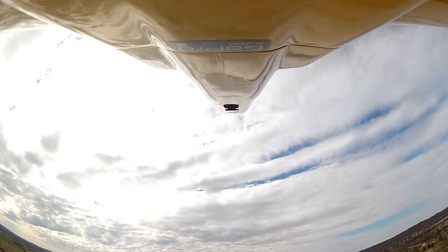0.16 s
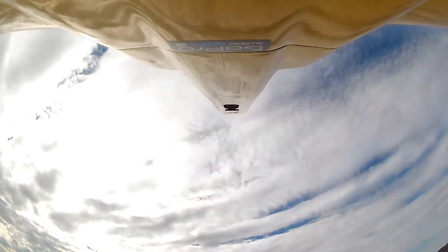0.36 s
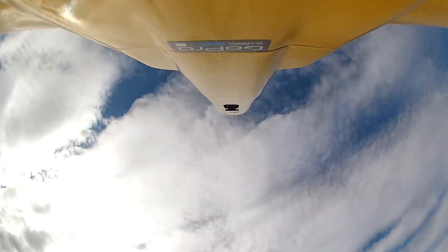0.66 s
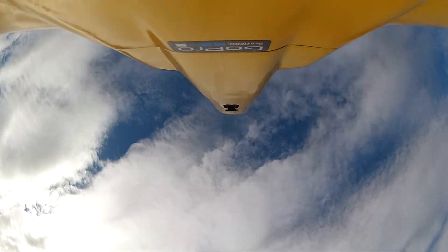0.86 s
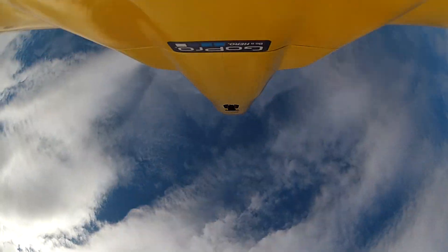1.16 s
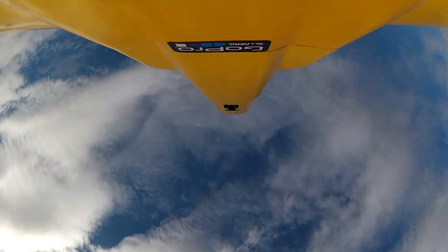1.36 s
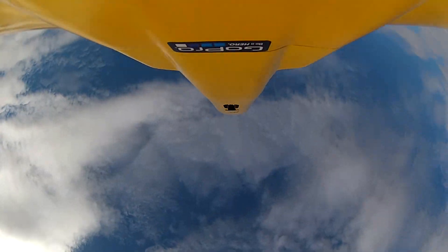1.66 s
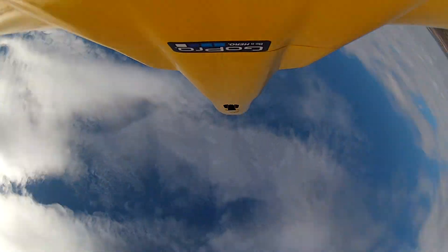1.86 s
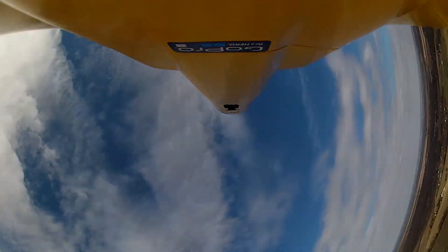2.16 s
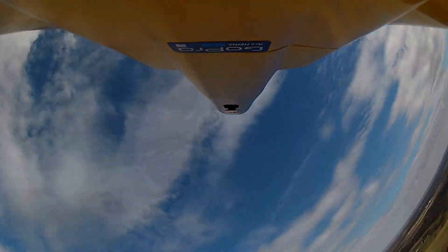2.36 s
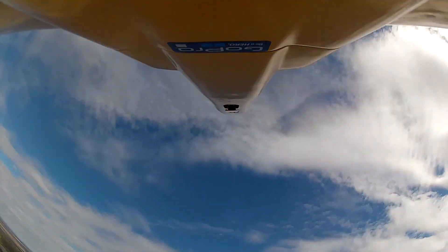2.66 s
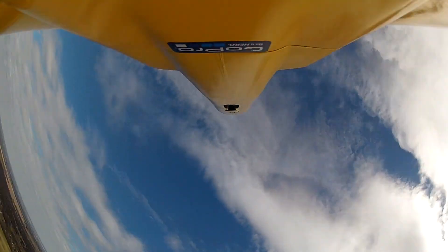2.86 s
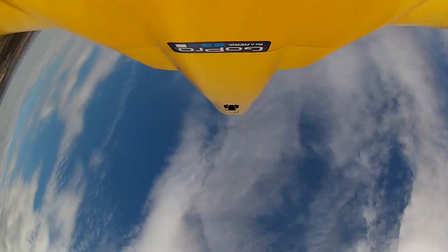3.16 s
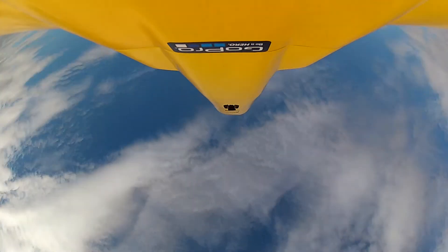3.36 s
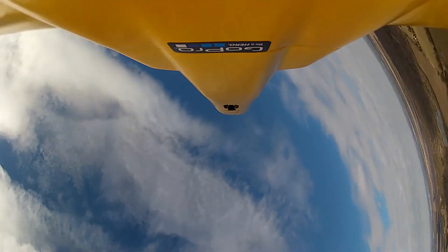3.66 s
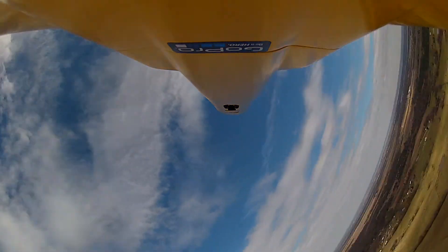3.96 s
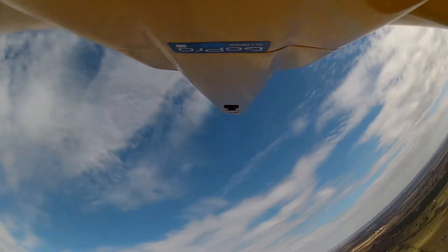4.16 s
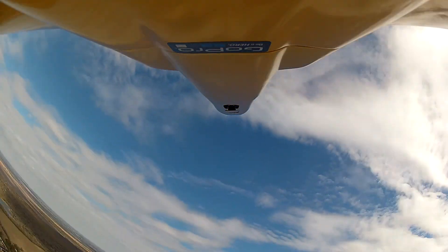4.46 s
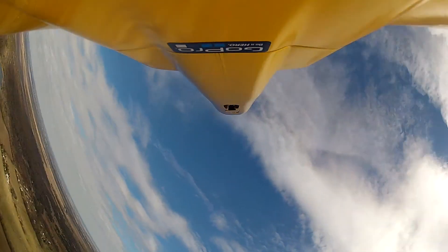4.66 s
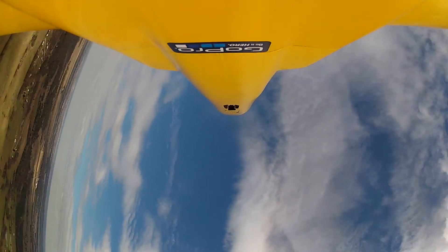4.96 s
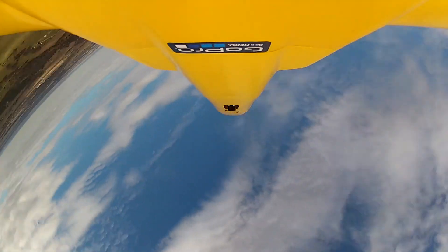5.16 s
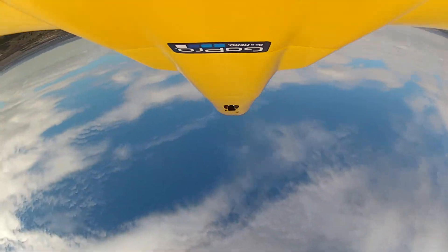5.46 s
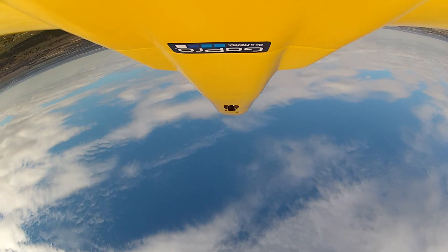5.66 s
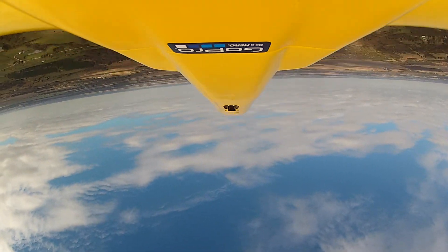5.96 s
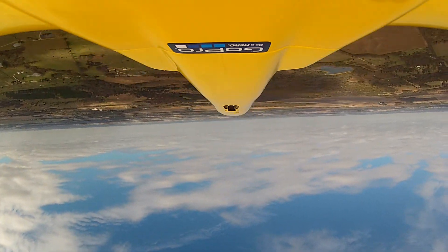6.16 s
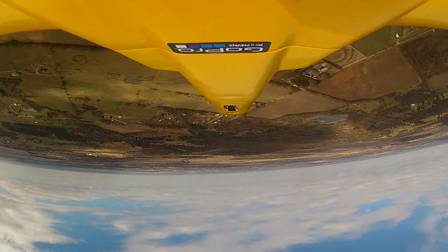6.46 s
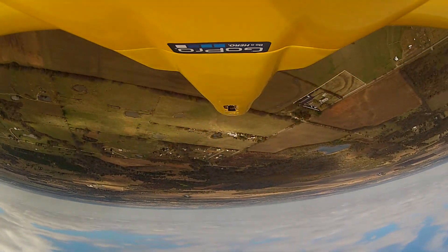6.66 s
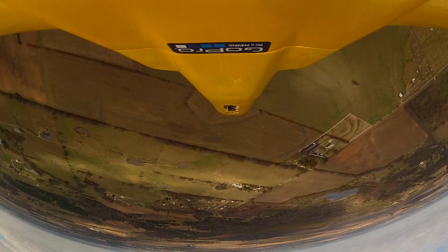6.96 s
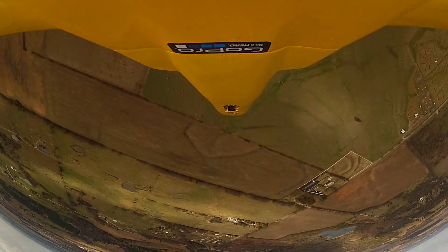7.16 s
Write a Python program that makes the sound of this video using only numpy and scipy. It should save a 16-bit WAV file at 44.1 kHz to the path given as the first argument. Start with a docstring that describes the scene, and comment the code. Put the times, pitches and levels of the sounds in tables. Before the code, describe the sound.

A small turbine jet is heard in flight, very close, from a microphone fixed to its fuselage. From the start there is a ringing, slightly metallic roar and a crackling hiss with a glassy top. A clean, high engine whine sits within it, nearly constant in pitch, growing louder over the first four seconds. Around 2 seconds the rush of air builds, and a low, hollow buffeting rises in the airframe. The whole sound dips very briefly a few times, most noticeably near 2 seconds. At about 4.8 seconds the engine spools down: the whine softens and glides lower, then swells again around 6 to 6.5 seconds as it settles on a lower note. The gusty air rush and low rumble keep growing through this, and stay strong until the end, a little after 7 seconds.

```python
"""Small turbine jet, heard from on board.

In the open air, the microphone rides in a camera fixed to the fuselage as the jet rolls and dives.
Close by, the shaft whines at full power, then spools down near 5 s, over the jet's roar and hiss.
The rush of air grows with speed and rings in the airframe and the camera housing.
The camera's gain control ducks briefly, and its low-rate sample-and-hold adds a glassy treble."""
import sys
import numpy as np
from scipy import signal
from scipy.fft import rfft, irfft
from scipy.io import wavfile
from scipy.ndimage import uniform_filter1d

SR = 44100
rng = np.random.default_rng(int(sys.argv[2]) if len(sys.argv) > 2 else 0)


def master(y):
    """Save y as 16-bit WAV."""
    cut = np.clip(np.atleast_2d(y).T, -1, 1)
    pcm = np.round(cut * 32767)  # scale
    wavfile.write(sys.argv[1], SR, pcm.astype(np.int16))


N = 322371
TIME, FREQ = np.arange(N) / SR, np.fft.rfftfreq(N, 1 / SR)


def shaft(cut_s=4.668, lag_s=0.2584, low_hz=1137.5, unload_s=4.82, unload_db=5.5, db_per_octave=12):
    """Speed (Hz) and whine level (dB): the throttle is cut and the shaft follows through three lags."""
    # the shaft at full throttle, creeping up: t/s, rotation f/Hz, whine level/dB
    full_power = [(0.15, 1810, -34.5), (0.6, 1814, -30), (1.75, 1827, -28), (2.3, 1825.5, -27.5),
                  (2.7, 1827, -25.2), (3.9, 1834, -23.4), (4.7, 1830, -23.6)]
    full_hz, full_db = curves(full_power)
    lags = np.maximum(TIME - cut_s, 0) / lag_s
    hz = low_hz + (full_hz - low_hz) * (1 + lags + lags ** 2 / 2) * np.exp(-lags)
    # off load the whine loses some level at once, then more as the shaft slows
    unloaded = (1 + np.tanh((TIME - unload_s) / 0.04)) / 2
    return hz, full_db - unload_db * unloaded + db_per_octave * np.log2(hz / full_hz)


def whine(trim_db=-0.03, waver_hz=0.69, shimmer_db=1.14, octave_db=-24):
    """One clean tone at the shaft rate, shaken a little by the air, with a faint octave."""
    hz, db = shaft()
    # the slowing whine sweeps into a resonance of the airframe
    peak_hz, width_hz, peak_db = 1169, 56, 12.5
    resonance = 1 + (gain_of(peak_db) - 1) / (1 + (2 * (hz - peak_hz) / width_hz) ** 2)
    phase = 2 * np.pi * np.cumsum(hz + waver_hz * wander(11.7)) / SR
    tone = np.sin(phase) + gain_of(octave_db) * np.sin(2 * phase)
    return np.sqrt(2) * tone * resonance * gain_of(db + trim_db + shimmer_db * wander(24))


def jet(roar_trim_db=0.5, hiss_trim_db=3.0, shrill_db=-29.0, surge_db=0.62, crackle_db=0.5):
    """The jet at close range: its roar rings fuselage and housing and surges with a crackling hiss."""
    # strength of the jet: t/s, relative roar level/dB, relative hiss level/dB
    jet_levels = [(0, -21, -35), (1, -21, -34), (1.4, -22.5, -37), (1.9, -21, -35), (2.6, -24, -34.3),
                  (3.2, -25, -37), (4.6, -26.5, -39.5), (4.95, -24.5, -37.5), (5.7, -23, -37.5),
                  (7.3, -23, -39.5)]
    # resonances of fuselage and camera housing: f/Hz, width/Hz, relative level/dB
    body_modes = [(267.4, 17, -8), (536, 32, -14), (874, 170, -20), (1880, 640, -15), (2180, 115, -4.5),
                  (2422, 232, 0), (2575, 92, 0.5)]
    # upper resonances of the housing: f/Hz, width/Hz, relative level/dB
    shrill_modes = [(2750, 600, 0), (3103, 140, 4.5), (3575, 207, 4.5), (3944, 165, -1.5)]
    # spectrum of the hiss: f/Hz, relative level/dB
    hiss_spectrum = [(30, -18), (300, -3.5), (1500, 1), (3500, -20), (4250, 5.5), (4620, 6.5), (4930, 2),
                     (5230, 6.5), (5650, 5.5), (5880, -4), (6000, -15)]
    roar_db, hiss_db = curves(jet_levels)
    surge = gain_of(surge_db * wander(13))
    roar = ringing(body_modes) * gain_of(roar_db + roar_trim_db)
    shrill = ringing(shrill_modes) * gain_of(shrill_db + 0.54 * (roar_db - roar_db.mean()))
    hz, db = np.transpose(hiss_spectrum)
    hiss_shape = gain_of(np.interp(np.log(FREQ + 1), np.log(hz), db))
    bursts = rng.standard_normal(N) * gain_of(crackle_db * wander(900))
    hiss = unit_rms(filtered(bursts, hiss_shape)) * gain_of(hiss_db + hiss_trim_db)
    return (roar + shrill + hiss) * surge


def slipstream(rush_trim_db=1, mount_db=-43.0, gust_db=1.0):
    """Faster air shakes the panels and the camera mount and blows harder across the cavities."""
    # airflow, growing with speed: t/s, buffeting level/dB, relative rush level/dB
    airflow = [(0.2, -43, -34), (0.7, -43.5, -29.5), (1.55, -41, -29), (2.25, -34, -24), (4.1, -35.5, -24),
               (5.3, -31.3, -22.5), (6.0, -29.3, -24), (7.3, -29, -23)]
    # airframe resonances under buffeting: f/Hz, width/Hz, relative level/dB
    panel_modes = [(110.5, 15, -3.5), (151.5, 10, 3), (168, 12.5, 0.5), (195, 30, 1), (247.4, 54.4, -1),
                   (497, 33, -12), (838, 50, -9)]
    # lowest sway of the camera mount: f/Hz, width/Hz, relative level/dB
    mount_modes = [(59.7, 10.6, 0)]
    # air spaces rung by the slipstream: f/Hz, width/Hz, relative level/dB
    cavity_modes = [(520, 40, -13), (560, 38, -13), (660, 190, -19), (848, 58, -15.5), (1005, 140, -16.5),
                    (1197, 102, 0), (1415, 204, -10.5), (1916, 187, -4.5), (3060, 130, -13.5),
                    (3675, 172, -10.5), (4660, 130, -24), (5186, 150, -18)]
    buffet_db, rush_db = curves(airflow)
    gusts = gust_db * wander(13)
    panels = ringing(panel_modes) * gain_of(buffet_db + gusts)
    mount = ringing(mount_modes) * gain_of(mount_db + 0.47 * (buffet_db - buffet_db.mean()))
    cavities = ringing(cavity_modes) * gain_of(rush_db + rush_trim_db + gusts)
    return panels + mount + cavities


def gain_ducks(peak_share=0.83, peak_s=0.0049):
    """After each listed sharp peak, the camera's gain control briefly ducks the sound, then recovers."""
    # ducks of the gain control: t/s, depth before smoothing/dB, recovery/s
    ducks = [(0.272, 4, 0.06), (1.883, 6, 0.048), (2.021, 4, 0.087), (3.864, 6, 0.019), (4.446, 4, 0.029),
             (5.125, 3.5, 0.069)]
    db = np.zeros(N)
    for at_s, depth_db, recovery_s in ducks:
        away_s = abs(TIME - at_s)
        peak = peak_share * np.exp(-away_s / peak_s)
        duck = -np.exp(-away_s / recovery_s)
        db += depth_db * np.where(TIME < at_s, peak, duck)
    return gain_of(uniform_filter1d(db, size=100))


def ringing(modes):
    """Turbulence heard through a set of steep-sided resonances, at rms 1."""
    power = sum(gain_of(db) ** 2 / (1 + ((FREQ - hz) / (width * np.pi / 4)) ** 2) ** 2
                for hz, width, db in modes)
    return noise(np.sqrt(power))


def wander(rate_hz):
    """Chance motion of rms 1, up to about the given rate."""
    return noise(1 / np.sqrt(1 + (FREQ / rate_hz) ** 4))


def noise(shape):
    """Noise of rms 1 with the given amplitude spectrum."""
    return unit_rms(filtered(rng.standard_normal(N), shape))


def filtered(x, shape):
    """Applies a gain at each frequency."""
    return irfft(rfft(x) * shape, N)


def curves(rows):
    """Each column of a table, joined by straight lines in time."""
    times, *columns = np.transpose(rows)
    return [np.interp(TIME, times, column) for column in columns]


def gain_of(db):
    """Decibels to amplitude."""
    return 10 ** (np.asarray(db) / 20)


def unit_rms(x):
    """Scales to rms 1."""
    return x / np.sqrt(np.mean(x ** 2) + 1e-20)


def scene():
    """Engine and air, close around one microphone on the fuselage, ducked by the camera's gain control."""
    return ((whine() + slipstream() + jet()) * gain_ducks())[None]


def record(dry, low_cut_hz=34, hold_hz=12000, mirror_trim_db=0.5, top_hz=15250):
    """The camera cuts the lows, then holds each sample, mirroring the sound around the hold rate."""
    passband = (FREQ < hold_hz / 2) / np.sqrt(1 + (low_cut_hz / (FREQ + 1)) ** 8)
    clock = 1 + 2 * gain_of(mirror_trim_db) * np.cos(2 * np.pi * hold_hz * TIME)
    sampled = filtered(dry, passband) * clock
    held = filtered(sampled, np.sinc(FREQ / hold_hz))
    high_cut = signal.firwin(511, top_hz, window=("kaiser", 9), fs=SR)
    return signal.oaconvolve(held, high_cut[None], "same")


dry = scene()
out = record(dry)
master(out)
```